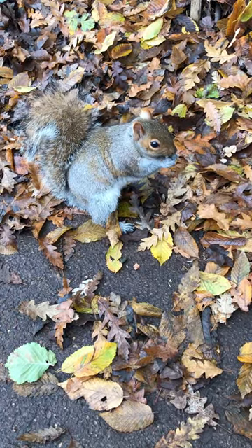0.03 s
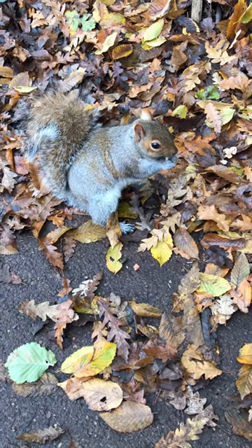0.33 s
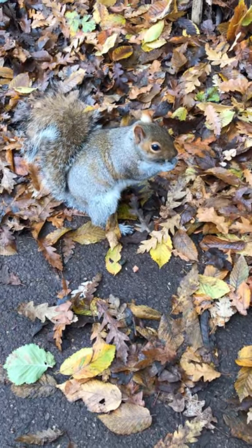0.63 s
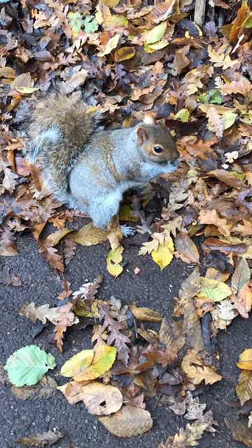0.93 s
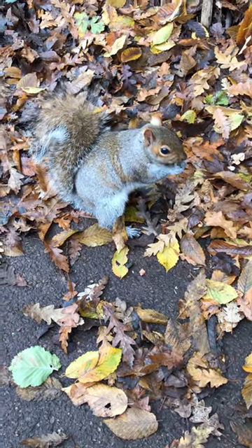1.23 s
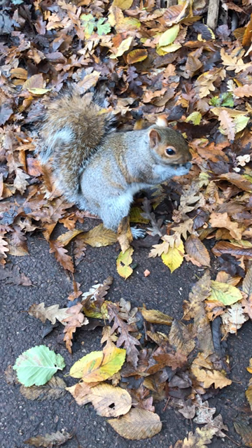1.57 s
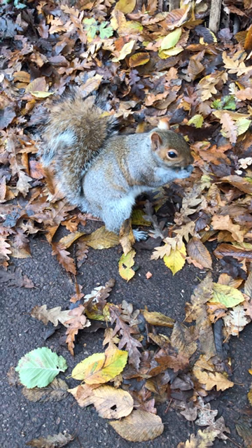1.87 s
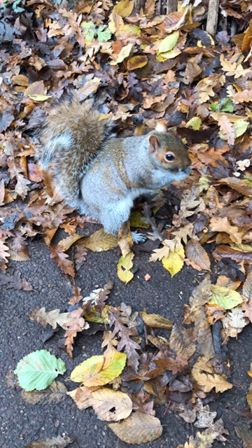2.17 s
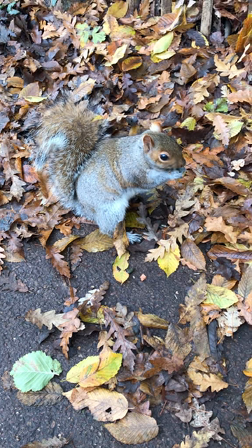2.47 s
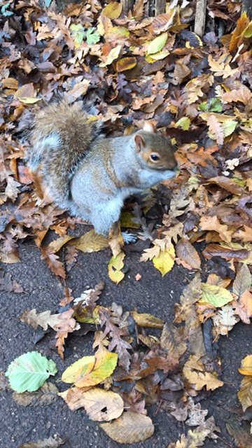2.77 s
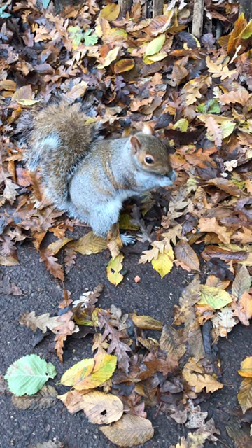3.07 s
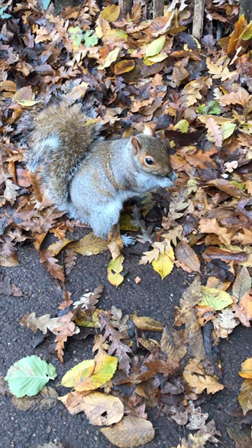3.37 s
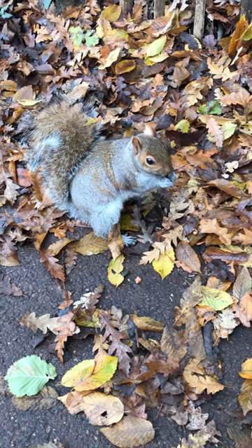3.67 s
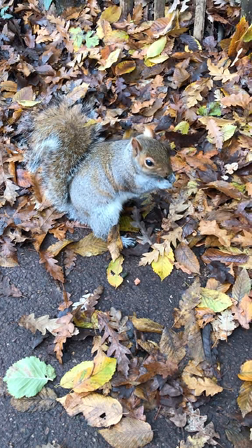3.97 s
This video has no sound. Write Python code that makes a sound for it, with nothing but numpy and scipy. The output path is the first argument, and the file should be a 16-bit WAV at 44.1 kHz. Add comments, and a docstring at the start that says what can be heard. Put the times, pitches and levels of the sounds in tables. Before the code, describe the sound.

A squirrel gnaws its food close by, making faint dry snaps and short crunches that come quickly at first, then thin out. Dead leaves rustle and scuff softly in a park, while distant traffic rumbles underneath.

```python
"""Dry snaps and short crunches over a fine rustle: a squirrel gnaws its food in dead leaves in a park.
Each snap is one fracture ringing a fragment; a crunch is a run of tiny fractures under the teeth.
The leaf litter gives duller scuffs and scatters the near sounds into a short tail.
Far traffic rumbles, one engine speeds up, and a distant bird calls once."""
import sys
import numpy as np
from scipy import signal
from scipy.fft import rfft, irfft
from scipy.io import wavfile

SR = 44100
rng = np.random.default_rng(int(sys.argv[2]) if len(sys.argv) > 2 else 0)


def store_wav(level_fs):
    """Save 16-bit WAV to argv[1]."""
    pcm = np.round(np.clip(np.atleast_2d(level_fs), -1, 1) * 32767)
    wavfile.write(sys.argv[1], SR, pcm.T.astype(np.int16))


N = 176400
TIME_S = np.arange(N) / SR
CUTOFF_HZ = 16000

# Spectrum of the rustle and the leaf scatter: freq_hz, gain_db
RUSTLE_SPECTRUM = [(800, -8.5), (3000, 2), (6200, -0.5), (9000, -1.5), (10300, -6), (12500, -1.5),
                   (16000, -8.5)]


def from_db(db):
    """Decibels to gain."""
    return 10 ** (np.asarray(db) / 20)


def unit_rms(x):
    """Scale to unit rms."""
    return x / np.sqrt(np.mean(x ** 2) + 1e-20)


def per_sample(rows):
    """Interpolate each column after time_s to every sample."""
    time_s, *columns = np.transpose(rows)
    return [np.interp(TIME_S, time_s, column) for column in columns]


def drift(rate_hz):
    """Slow random motion, unit spread."""
    hop, settle = 40, 2000
    r = np.exp(-2 * np.pi * rate_hz * hop / SR)
    white = rng.standard_normal(N // hop + settle + 2)
    slow = signal.lfilter([1], [1, -2 * r, r * r], white)[settle:]
    return np.interp(np.arange(N) / hop, np.arange(len(slow)), unit_rms(slow))


def colour(x, spectrum, size=8192):
    """Minimum-phase filter of the given shape; keeps the power of white noise."""
    freq_hz, gain_db = np.transpose(spectrum)
    grid_hz = np.maximum(np.arange(size // 2 + 1) * SR / size, 1)
    gain = unit_rms(from_db(np.interp(np.log(grid_hz), np.log(freq_hz), gain_db)))
    cepstrum = irfft(np.log(gain))
    cepstrum[1:size // 2] *= 2
    cepstrum[size // 2 + 1:] = 0
    impulse = irfft(np.exp(rfft(cepstrum)))
    return signal.fftconvolve(x, impulse)[:len(x)]


def noise(spectrum):
    """Steady coloured noise, unit rms."""
    return unit_rms(colour(rng.standard_normal(N + SR), spectrum)[SR:])


def ring(x, ring_hz, width_hz, boost_db):
    """Add one resonance."""
    r = np.exp(-np.pi * width_hz / SR)
    feedforward = np.array([1, 0, -1]) * (1 - r * r) / 2
    feedback = [1, -2 * r * np.cos(2 * np.pi * ring_hz / SR), r * r]
    return x + from_db(boost_db) * signal.lfilter(feedforward, feedback, x)


def grains(count, rate_per_s, spread_db):
    """Random clicks of uneven size, unit rms."""
    sizes = from_db(spread_db * np.minimum(rng.exponential(1, count), 4))
    signs = rng.choice([-1, 1], count)
    hits = rng.random(count) < rate_per_s / SR
    return unit_rms(sizes * signs * hits)


def swell(x, length_s, rms_db):
    """One half-sine rise and fall."""
    shaped = x * np.sin(np.pi * np.minimum(TIME_S[:len(x)] / length_s, 1))
    return from_db(rms_db) * shaped * np.sqrt(length_s * SR / (np.sum(shaped ** 2) + 1e-20))


def decay_envelope(x, t60_s):
    """Running rms with exponential decay."""
    r = from_db(-60 / (t60_s * SR)) ** 2
    return np.sqrt(signal.lfilter([1 - r], [1, -r], x ** 2 + 1e-18))


def add(out, start_s, x):
    """Mix x in at start_s."""
    i = max(int(start_s * SR), 0)
    out[i:i + len(x)] += x[:max(N - i, 0)]


def traffic(rumble_db=-51):
    """Low town rumble and the wash of tyres on a far road."""
    # Spectra of traffic with air, and of tyres: freq_hz, gain_db
    rumble_spectrum = [(20, -30.5), (32, -7.5), (60, 3), (105, -2), (280, -10.5), (480, -21.5), (950, -24),
                       (2300, -39), (5000, -37.5), (16000, -45.5)]
    tyre_spectrum = [(250, -10), (680, -3.5), (980, 0), (1400, -6.5), (6000, -29)]
    # Tyre wash: time_s, level_db
    tyre_curve = [(0, -57.5), (.5, -68), (1.4, -67.5), (1.7, -61), (2.6, -63), (4, -61)]
    tyre_db, = per_sample(tyre_curve)
    return from_db(rumble_db) * noise(rumble_spectrum) + from_db(tyre_db) * noise(tyre_spectrum)


def engine(jitter_rad=.11, exhaust_band_hz=(248, 630), exhaust_db=-10):
    """Only low firing orders and a dull exhaust rush carry this far; the orders waver on the way."""
    # Engine run: time_s, firing_hz, fundamental_db, overtone_db
    run = [(0, 68.64, -61, -64), (.22, 75.93, -48.5, -67.5), (.6, 72.64, -49, -56),
           (.85, 68.9, -54.5, -62.5), (1.1, 74.22, -49.5, -67.5), (1.62, 70.92, -59, -56),
           (1.78, 54.04, -51, -59.5), (2.28, 67.36, -46.5, -61), (2.5, 73.33, -47, -52.5),
           (2.64, 76.97, -52.5, -59.5), (2.72, 78.83, -38, -62), (2.8, 81.5, -40, -51.5),
           (2.87, 86.8, -53.5, -56.5), (2.94, 90.95, -42, -56), (3.15, 94.45, -52.5, -51),
           (3.28, 93, -49.5, -59), (3.44, 85, -69, -76)]
    # Upper firing orders: multiple, gain_db
    overtones = [(2, 1.5), (3, -10.5), (4, -13.5)]
    firing_hz, fundamental_db, overtone_db = per_sample(run)
    phase = 2 * np.pi * np.cumsum(firing_hz) / SR + jitter_rad * drift(rate_hz=59)
    # multiple, level_db, waver_db
    orders = [(0.99, fundamental_db, 1.2)]
    orders += [(round(multiple), overtone_db + gain_db, 2.8) for multiple, gain_db in overtones]
    hum = np.zeros(N)
    for multiple, level_db, waver_db in orders:
        amplitude = np.sqrt(2) * from_db(level_db + waver_db * drift(rate_hz=10))
        hum += amplitude * np.sin(multiple * phase + 2 * np.pi * rng.random())
    puffs = rng.standard_normal(N) * (1 + np.cos(phase))
    band = signal.butter(2, exhaust_band_hz, "band", fs=SR, output="sos")
    rush = unit_rms(signal.sosfilt(band, puffs))
    speed_gain = (firing_hz / firing_hz.max()) ** 2
    return hum + from_db(overtone_db + exhaust_db) * speed_gain * rush


def bird(middle_s=0.064, length_s=0.034, top_hz=739, sag=0.11):
    """One short distant yelp; pitch and level arch together."""
    # Harmonics of the call: multiple, level_db
    partials = [(1, -53), (2, -50.5)]
    position = np.clip(2 * (TIME_S - middle_s) / length_s, -1, 1)
    pitch_hz = top_hz * (1 - sag * position ** 2)
    phase = 2 * np.pi * np.cumsum(pitch_hz) / SR
    tone = sum(np.sqrt(2) * from_db(db) * np.sin(round(k) * phase) for k, db in partials)
    return np.cos(np.pi * position / 2) ** 2 * tone


def rustle(clump_db=2.8):
    """Faint fine rustle with lulls: clumps of ticks, each a hiss that dies in milliseconds."""
    # Background rustle: time_s, level_db
    rustle_level = [(0, -62), (.21, -66), (.29, -62.5), (.52, -69.5), (.68, -61), (1.0, -63), (1.09, -67.5),
                    (1.28, -64), (1.5, -77), (1.6, -65), (2.12, -64.5), (2.46, -73.5), (2.7, -68.5),
                    (3.0, -74.5), (3.24, -61), (3.42, -71.5), (3.76, -79), (3.9, -63.5)]
    level_db, = per_sample(rustle_level)
    clicks = grains(N, rate_per_s=1200, spread_db=2.8) * from_db(clump_db * drift(rate_hz=21))
    ticks = decay_envelope(clicks, t60_s=.003) * rng.standard_normal(N)
    return from_db(level_db) * unit_rms(colour(ticks, RUSTLE_SPECTRUM))


def leaf_scatter(x, t60_s=0.043, gain_db=-6):
    """Leafy ground adds a very short diffuse tail with no ring."""
    return x + from_db(gain_db) * decay_envelope(x, t60_s) * noise(RUSTLE_SPECTRUM)


def scuffs(gain_db=1, count=8192):
    """Damp leaves and grit rub together."""
    # Rubs: start_s, length_s, relative_db
    rubs = [(1.675, 0.027, -62.5), (1.965, 0.036, -57), (2.023, 0.062, -57), (2.089, .015, -59.5),
            (2.263, .036, -62), (2.536, 0.061, -64.5), (2.778, 0.017, -61), (3.082, .02, -63),
            (3.525, 0.079, -60.5)]
    # Leaf litter: freq_hz, gain_db
    litter_spectrum = [(200, -19.5), (600, 6), (1200, 4), (3500, -2), (16000, -11.5)]
    out = np.zeros(N)
    for start_s, length_s, relative_db in rubs:
        grit = grains(count, rate_per_s=3900, spread_db=-1)
        add(out, start_s, swell(grit, length_s, relative_db + gain_db))
    return colour(out, litter_spectrum)


def crunches(gain_db=-7, count=4096):
    """Dense tiny fractures swell and stop as the teeth break through."""
    # Bites: start_s, length_s, relative_db, ring_hz
    bites = [(0.624, 0.042, -53, 7860), (0.686, 0.034, -49.5, 4500), (0.891, 0.019, -42, 3800),
             (0.976, 0.013, -38.5, 7200), (0.997, 0.044, -50, 6460), (1.153, 0.023, -45.5, 5500),
             (1.168, .035, -51.5, 7010), (1.242, 0.016, -38.5, 9140), (1.352, 0.048, -55.5, 8350),
             (2.37, 0.042, -56.5, 11000), (2.675, 0.042, -53.5, 8750), (3.695, .032, -53.5, 9580)]
    out = np.zeros(N)
    for start_s, length_s, relative_db, ring_hz in bites:
        cracks = grains(count, rate_per_s=1400, spread_db=-1.5)
        cracks = ring(cracks, ring_hz, width_hz=5900, boost_db=8.5)
        add(out, start_s, swell(cracks, length_s, relative_db + gain_db))
    return out


def snaps(t60_s=.008, gain_db=1, count=2048):
    """Each fracture is a sharp burst that rings its fragment; larger fragments are duller."""
    # Single fractures: start_s, relative_db, ring_hz
    fractures = [(.263, -49.5, 5450), (.2816, -45, 11100), (0.3719, -47, 7150), (0.4364, -48, 8700),
                 (0.458, -46.5, 10600), (0.4727, -49, 3500), (.479, -50.5, 3800), (0.5406, -48, 3870),
                 (0.5446, -49, 3700), (0.5954, -49, 3020), (0.698, -54, 4600), (0.727, -56, 5500),
                 (.7375, -46.5, 6200), (.754, -45, 6530), (0.8137, -47, 5540), (0.8253, -42, 8400),
                 (0.8925, -40, 2820), (.901, -40.5, 5360), (.941, -48.5, 6350), (.977, -46.5, 3170),
                 (0.9856, -44, 8700), (1.0555, -50, 6590), (1.15, -51, 5340), (1.247, -42.5, 4900),
                 (1.2522, -34, 9700), (1.2928, -46, 8940), (1.301, -49, 1790), (1.47, -48, 5766),
                 (1.696, -49.5, 1960), (2.517, -49.5, 9150), (2.6577, -51, 6000), (3.388, -54, 13430),
                 (3.4666, -53, 2147), (3.5077, -49.5, 2150), (3.7297, -50, 2000), (3.7307, -47, 5530),
                 (3.8531, -53, 6920), (3.8951, -48.5, 2200), (3.932, -55, 7420), (3.963, -48, 9240)]
    out = np.zeros(N)
    decay = from_db(-60 * TIME_S[:count] / t60_s)
    for start_s, relative_db, ring_hz in fractures:
        burst = ring(rng.standard_normal(count) * decay, ring_hz, width_hz=1100, boost_db=10.5)
        top_hz = min(2.4 * ring_hz, CUTOFF_HZ)
        burst = signal.lfilter(*signal.butter(2, top_hz, fs=SR), burst)
        burst = unit_rms(burst) * np.sqrt(SR / 1000 / count)  # energy of 1 ms at unit rms
        add(out, start_s, from_db(relative_db + gain_db) * burst)
    return out


def gnawing():
    """Snaps and crunches coloured by the food."""
    # Food: freq_hz, gain_db
    food_spectrum = [(300, -14), (1300, 4.5), (2300, -0.5), (3500, 2.5), (5500, 2.5), (10500, 0.5),
                     (14000, 4)]
    return colour(snaps() + crunches(), food_spectrum)


def scene():
    """Squirrel close by over a fine rustle, town far behind; mono."""
    in_leaves = leaf_scatter(gnawing() + rustle() + scuffs())
    return (in_leaves + engine() + traffic() + bird())[None]


def record(dry):
    """Steep low-pass at CUTOFF_HZ."""
    return signal.sosfilt(signal.ellip(10, .2, 70, CUTOFF_HZ, fs=SR, output="sos"), dry)


dry = scene()
out = record(dry)
store_wav(out)
```